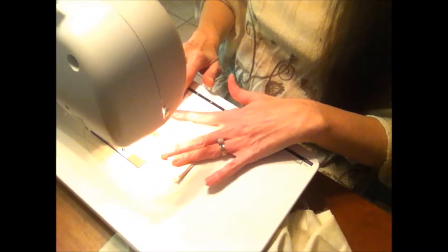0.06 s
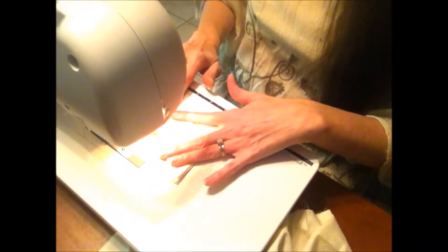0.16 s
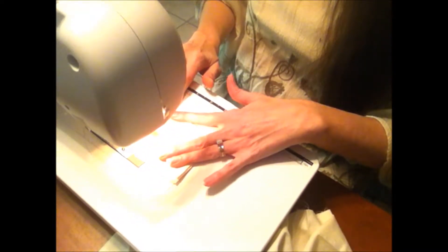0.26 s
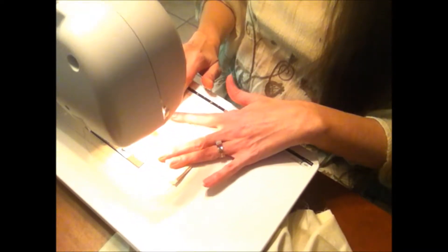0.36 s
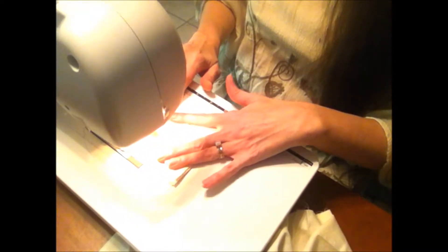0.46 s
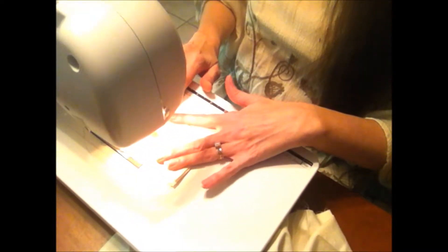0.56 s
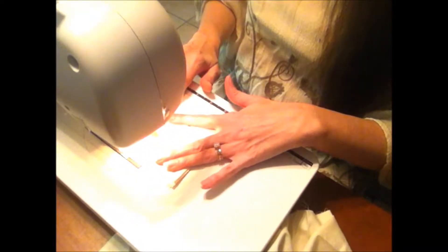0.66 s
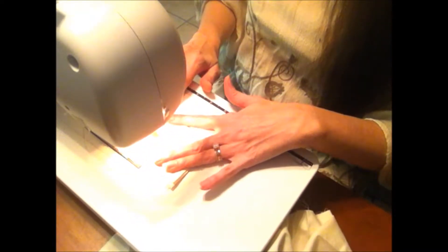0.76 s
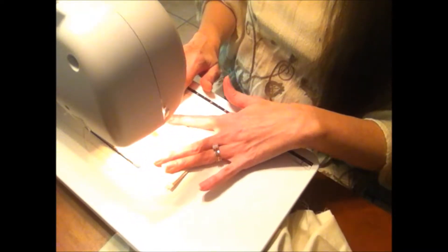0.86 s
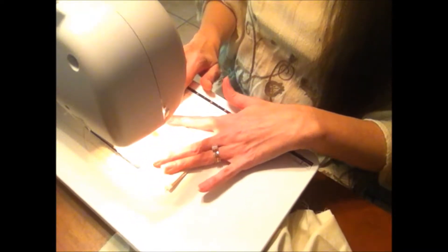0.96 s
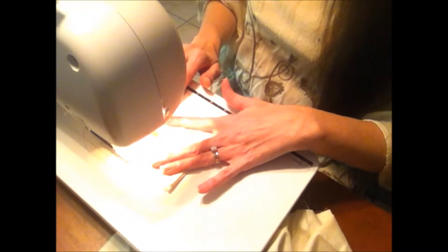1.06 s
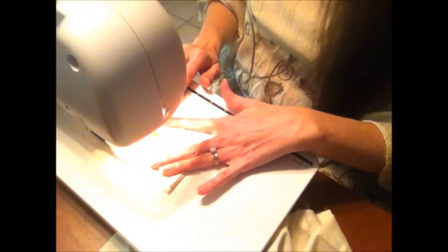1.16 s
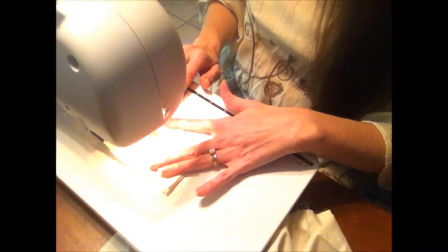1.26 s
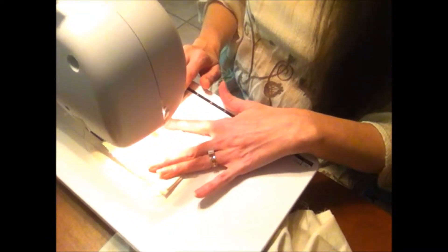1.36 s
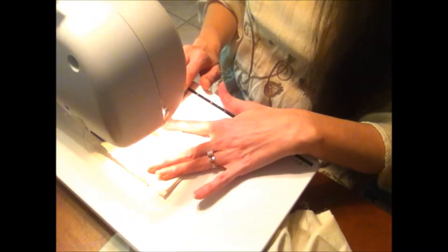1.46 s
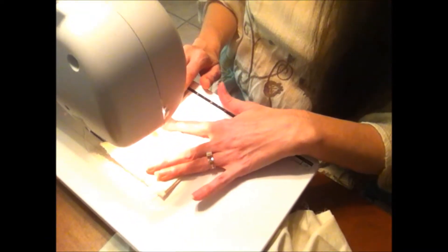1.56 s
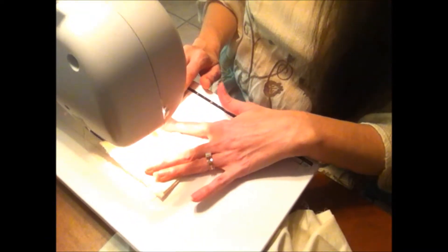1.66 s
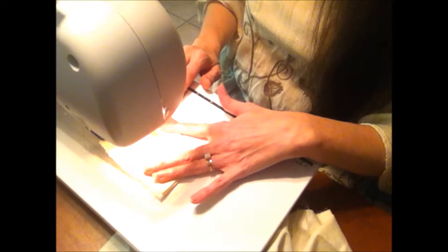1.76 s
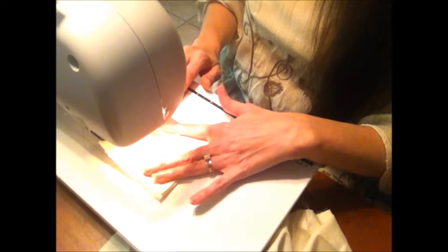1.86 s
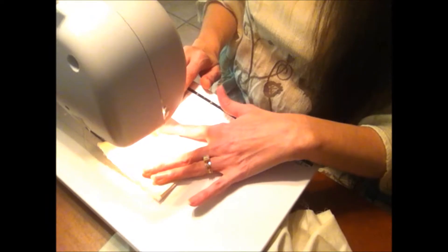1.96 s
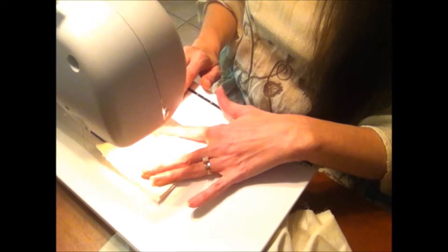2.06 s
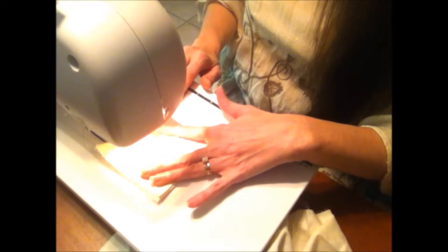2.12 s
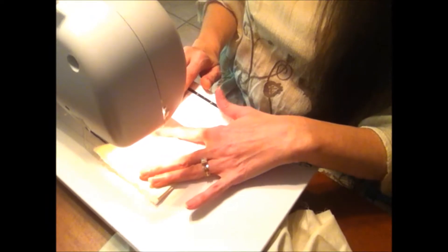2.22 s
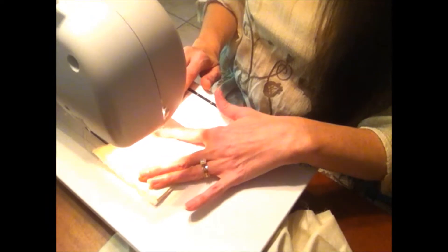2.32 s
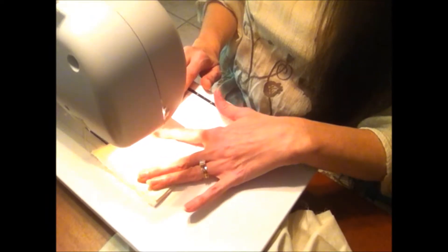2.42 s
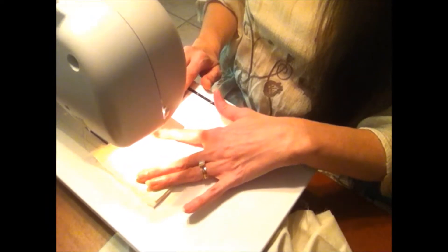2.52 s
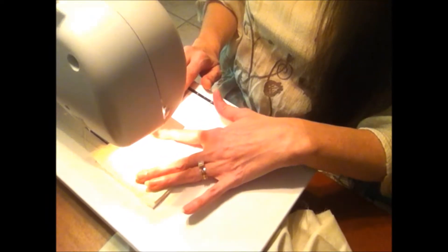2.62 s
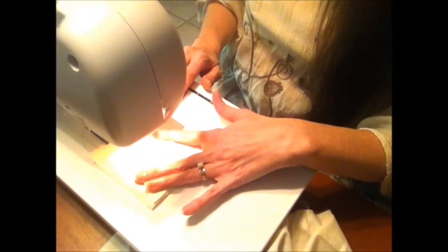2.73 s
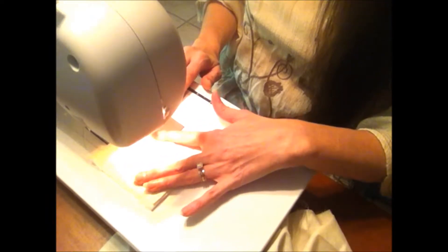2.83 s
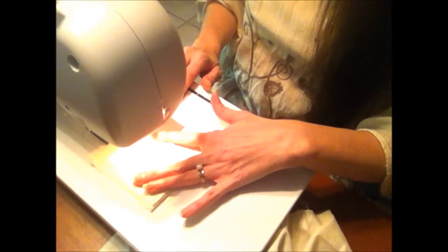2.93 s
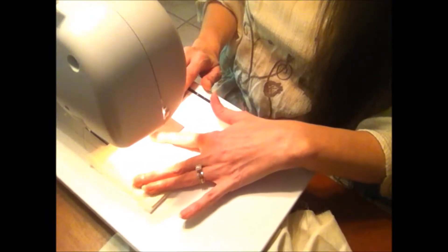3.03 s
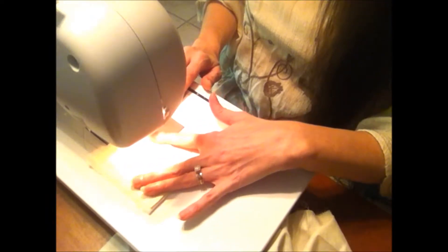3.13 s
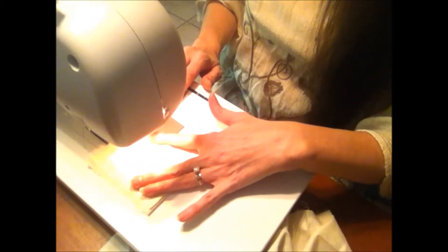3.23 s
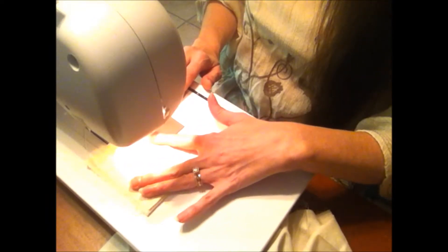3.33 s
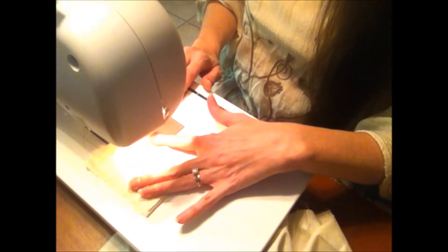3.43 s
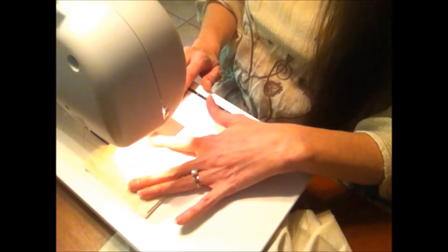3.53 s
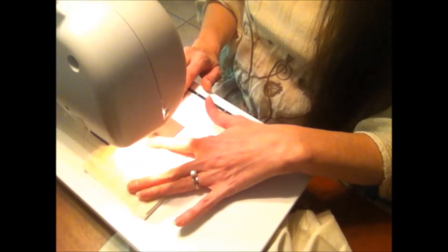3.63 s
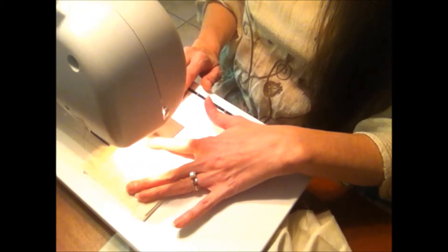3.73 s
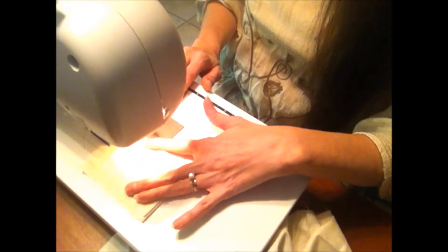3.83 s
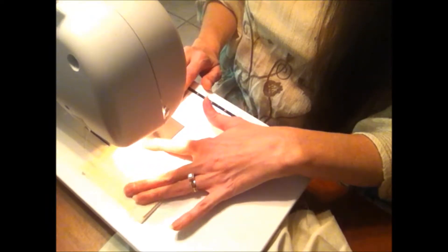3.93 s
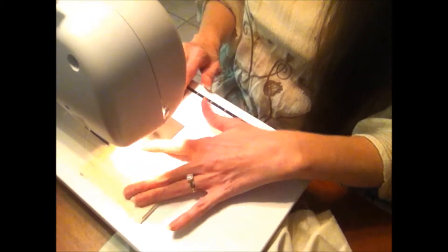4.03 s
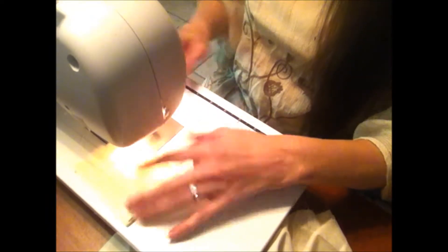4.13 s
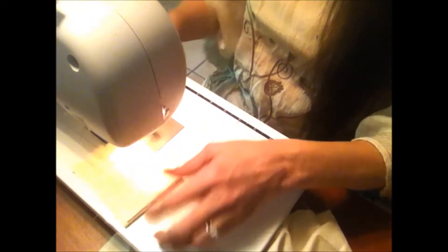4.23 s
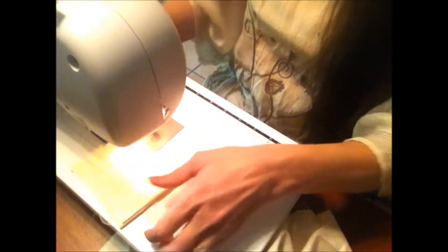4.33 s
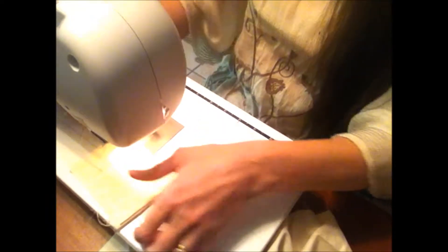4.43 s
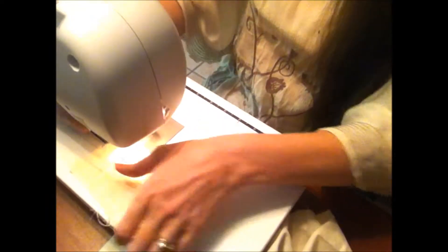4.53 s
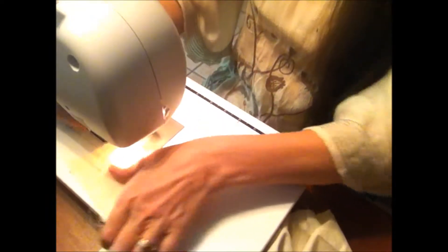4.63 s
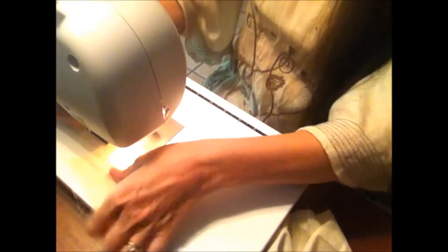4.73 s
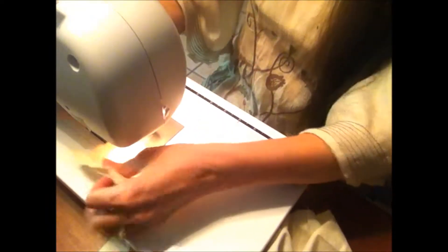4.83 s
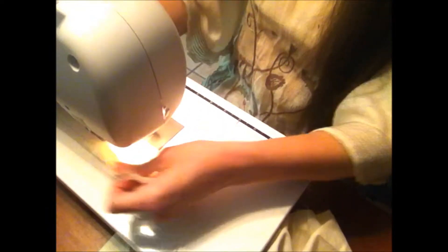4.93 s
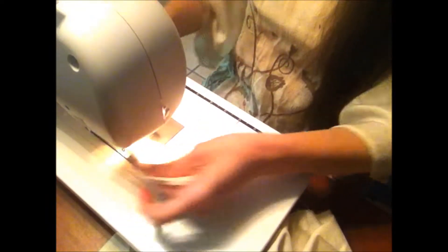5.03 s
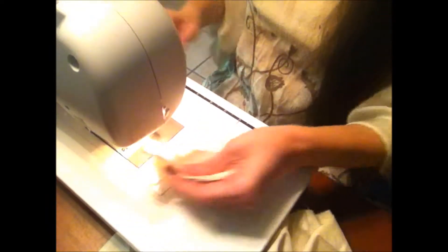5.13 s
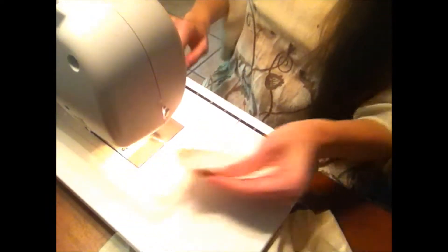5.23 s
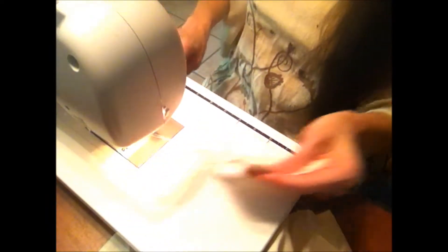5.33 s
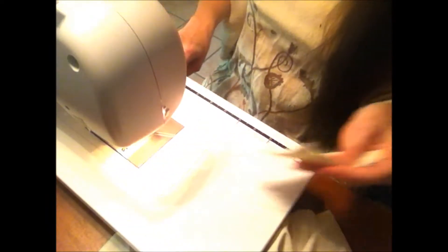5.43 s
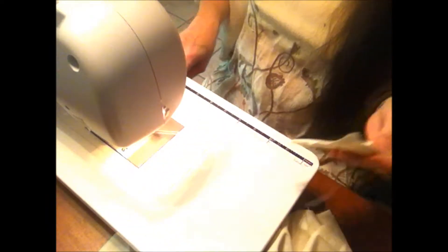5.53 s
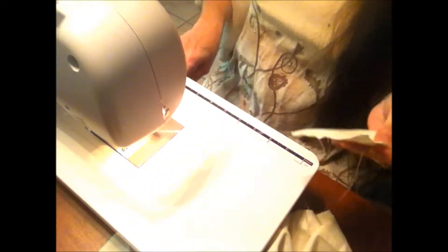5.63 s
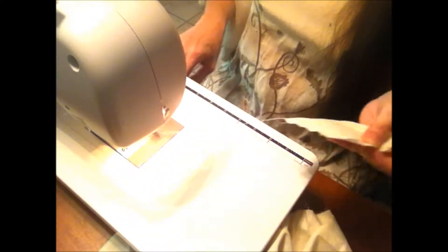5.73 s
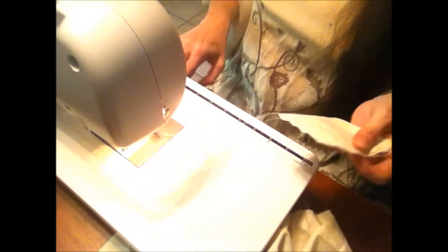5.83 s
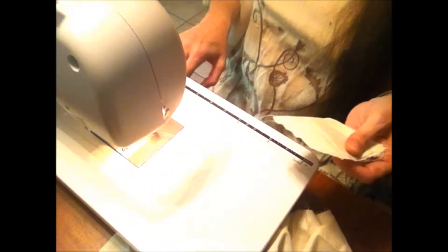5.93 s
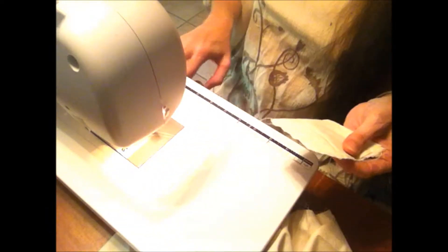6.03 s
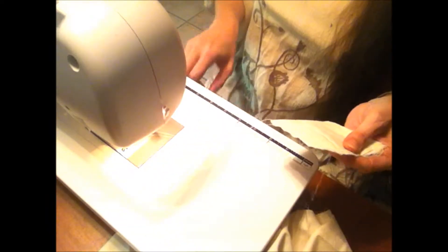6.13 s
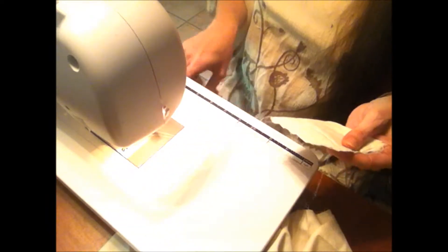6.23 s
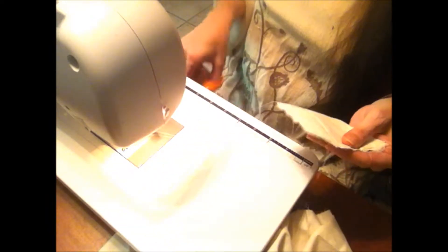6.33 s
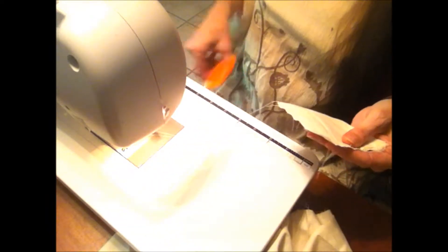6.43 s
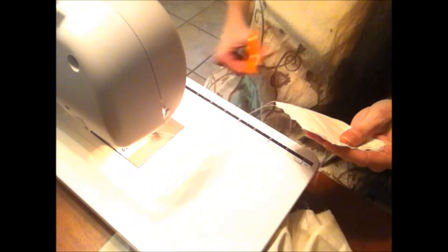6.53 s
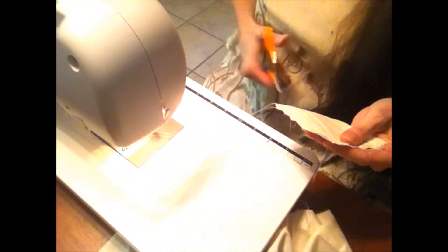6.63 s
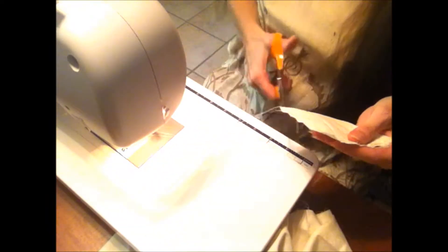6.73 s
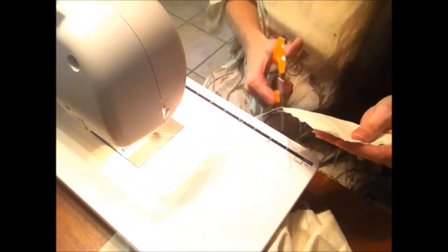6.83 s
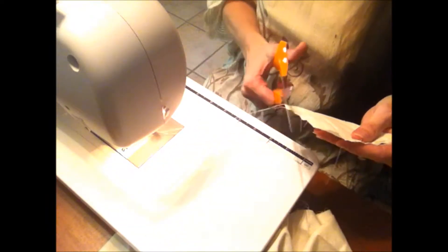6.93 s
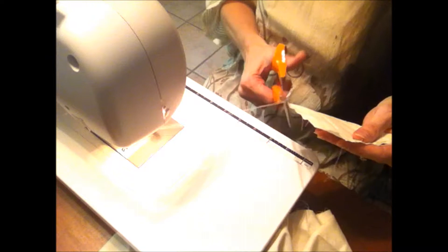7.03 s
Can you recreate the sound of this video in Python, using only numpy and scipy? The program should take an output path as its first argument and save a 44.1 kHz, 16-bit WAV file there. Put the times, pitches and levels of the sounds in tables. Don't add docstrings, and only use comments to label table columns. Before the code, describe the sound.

A sewing machine whirs and clatters at steady full speed, winds down to rest, then cloth rustles, scissors knock wood and snap sharply.

```python
import sys
import numpy as np
from scipy import signal
from scipy.fft import rfft, irfft
from scipy.io import wavfile
from scipy.ndimage import uniform_filter1d

SR = 44100
rng = np.random.default_rng(int(sys.argv[2]) if len(sys.argv) > 2 else 0)


def boost_factor(decibels):
    exponent = np.asarray(decibels, float) / 20
    return 10 ** exponent


def dump(signal):
    limited = np.clip(np.atleast_2d(signal).T, -1, 1)
    pcm = np.round(limited * 32767).astype(np.int16)
    wavfile.write(sys.argv[1], SR, pcm)


N = 311787
T = np.arange(N) / SR

SET_SPEED = 11.2912
RELEASE_S = 4.285
ROOM_T60_S = 0.21

# pitch in Hz, level in dB.
BODY_COLOUR = [(30, -61), (60, -24), (105, -26.5), (160, -24.5), (230, -10.5), (418, -9), (531, -5),
               (760, -7), (950, -7), (1600, -13), (1970, -19), (6510, -34.5), (11000, -36), (15000, -38)]
# pitch in Hz, width in Hz, boost in dB.
BODY_RINGS = [(331, 47, 6), (541, 25, 9), (705, 162, 5.5), (789, 88, 5), (1280, 13, 4), (2544, 47, 7.5),
              (4040, 640, 4.5), (4620, 100, 7.5), (6680, 940, 5.5)]
# pitch in Hz, width in Hz, boost in dB.
WOOD_RINGS = [(985, 80, 10), (1240, 80, 5), (1735, 150, 9), (2400, 170, 9), (2950, 220, 7), (3370, 150, 4),
              (4460, 250, 8)]


def rms_one(x):
    return x / np.sqrt(np.mean(x ** 2) + 1e-20)


def peak_one(x):
    return x / np.abs(x).max()


def colour(x, spectrum, peaks=(), tilt_db=0):
    hz = np.maximum(np.fft.rfftfreq(8192, 1 / SR), 5)
    spectrum_hz, spectrum_db = np.transpose(spectrum)
    level = np.interp(np.log(hz), np.log(spectrum_hz), spectrum_db) + tilt_db * np.log2(hz / 1000)
    for peak_hz, width, gain_db in peaks:
        level = level + gain_db / (1 + (2 * (hz - peak_hz) / width) ** 2)
    cepstrum = irfft(np.log(boost_factor(level)))
    cepstrum[1:4096] *= 2
    cepstrum[4097:] = 0
    response = irfft(np.exp(rfft(cepstrum)))
    return signal.fftconvolve(x, response / np.sqrt(np.sum(response ** 2)))[:len(x)]


def band(x, low_hz, high_hz):
    edges = np.clip([low_hz, high_hz], 10, .45 * SR)
    return signal.sosfilt(signal.butter(2, edges, "band", fs=SR, output="sos"), x)


def drift(rate):
    r = np.exp(-64 * np.pi * rate / SR)
    slow = signal.lfilter([1], [1, -2 * r, r * r], rng.standard_normal(N // 32 + 1502))[1500:]
    return np.interp(np.arange(N) / 32, np.arange(len(slow)), rms_one(slow))


def ring(x, hz, t60):
    r, w = boost_factor(-60 / (t60 * SR)), 2 * np.pi * hz / SR
    return signal.lfilter([0, np.sin(w)], [1, -2 * r * np.cos(w), r * r], x + 1e-18)


def bursts(times, level_db, t60, noise, rise_s=0.0024):
    clicks = np.zeros(len(noise))
    at = np.clip((np.asarray(times) * SR).astype(int), 0, len(noise) - 1)
    np.add.at(clicks, at, boost_factor(level_db))
    r = np.exp(-1 / (rise_s * SR))
    swell = signal.lfilter([1 - r], [1, -r], clicks + 1e-18)
    return signal.lfilter([1], [1, -boost_factor(-60 / (t60 * SR))], swell) * noise


def grains(per_s, spread_db):
    sizes = boost_factor(spread_db * np.minimum(rng.exponential(1, N), 5)) * rng.choice([-1, 1], N)
    return rms_one(sizes * (rng.random(N) < per_s / SR))


def varied(peaks):
    shares = rng.uniform(.5, 1, len(peaks))
    return [(hz, width, db * share) for (hz, width, db), share in zip(peaks, shares)]


def room(x):
    t = np.arange(int(.5 * SR)) / SR
    tail = rng.standard_normal(len(t)) * boost_factor(-60 * t / ROOM_T60_S) * (t > .006)
    tail = band(tail, 73, 10000)
    return x + boost_factor(-10) * signal.fftconvolve(x, tail / np.sqrt(np.sum(tail ** 2)))[:N]


def room_tone():
    # pitch in Hz, level in dB.
    tone_colour = [(12, -31), (20, -5.5), (38, -24.5), (124, 6.5), (270, -6), (841, -11), (940, -12),
                   (13100, -23), (15000, -24.5)]
    return boost_factor(-72) * rms_one(colour(rng.standard_normal(N), tone_colour))


def jolts():
    # start in seconds, peak in dB.
    jolt_rows = [(3.76, -64), (4.21, -65), (5.81, -72), (6.12, -74), (6.33, -70), (6.42, -62), (6.49, -69),
                 (6.675, -54.5)]
    s, level_db = np.transpose(jolt_rows)
    push = bursts(s, level_db, .01, np.ones(N), rise_s=.002)
    return boost_factor(level_db.max()) * peak_one(band(ring(push, 68, 0.068), 25, 200))


def ringing_parts():
    # start in seconds, pitch in Hz, peak in dB, 60 dB decay in seconds.
    steel_notes = [(5.756, 6200, -64, .03), (5.756, 8100, -66, .03), (5.809, 8150, -53, .11),
                   (5.809, 10300, -56, .09), (5.809, 6900, -58, .03), (5.905, 11000, -60, .03),
                   (5.905, 9300, -63, .02), (5.905, 12600, -60, .02), (5.93, 6800, -68, .3),
                   (6.597, 6160, -62, .1), (6.597, 6665, -60, .06), (6.597, 7010, -56, .06),
                   (6.597, 8620, -56, .09), (6.597, 9810, -64, .05), (6.597, 4040, -60, .05),
                   (4.984, 3850, -49, .035), (5.04, 4800, -66, .12), (6.678, 8200, -41, .12),
                   (6.678, 5810, -44, .1)]
    # start in seconds,
    # pitch in Hz, peak in dB, 60 dB decay in seconds.
    part_notes = [(4.29, 551, -35, 0.37), (4.5, 546, -40, 0.13), (4.785, 229, -47, 0.18),
                  (5.49, 280, -54, .06), (5.552, 227, -44, 0.066), (5.599, 230, -53, .05),
                  (5.658, 256, -45, 0.066), (5.815, 243, -44, .05), (5.972, 528, -44, 0.13),
                  (6.025, 555, -40, .06), (6.124, 325, -34, 0.13), (6.342, 214, -37.5, .05),
                  (6.419, 227, -34, .08), (6.493, 214, -31, 0.11), (6.536, 227, -42, .07),
                  (4.985, 803, -42, 0.057), (5.545, 2180, -43, .04), (5.545, 1750, -45, .04),
                   (5.547, 550, -44, 0.078), (5.6, 2450, -57, .03), (5.812, 750, -42, 0.073),
                   (5.94, 1750, -46, 0.056), (5.995, 2600, -52, .06), (6.122, 1750, -36, .03),
                   (6.124, 546, -37, 0.099), (6.14, 2400, -42, .04), (6.16, 550, -41, .08),
                   (6.343, 1750, -46, .03), (6.42, 1750, -33, .03), (6.42, 2450, -35, .03),
                   (6.442, 2530, -37, .03), (6.49, 1750, -33, .025), (6.68, 1000, -20, .025),
                   (6.712, 1330, -33, 0.027)]
    size = 12000
    out = np.zeros(N + size)
    for s, hz, level_db, t60 in steel_notes + part_notes:
        shake = bursts(np.zeros(1), np.zeros(1), .012, rng.standard_normal(size), rise_s=.0004)
        i = int(s * SR)
        out[i:i + size] += boost_factor(level_db) * peak_one(band(ring(shake, hz, t60), hz / 2, hz * 2))
    return out[:N]


def blows():
    # start in seconds, thud peak in dB,
    # softness as dB lost by the tick, ring pitch in Hz, ring against thud in dB.
    tap_rows = [(4.796, -58, 11, 500, 7), (5.016, -63, 7, 865, 15), (5.314, -69, 20, 616, -3),
                (5.351, -62, 14, 1530, 10), (5.399, -53, 5, 300, -13), (5.52, -44, 20, 1490, -5),
                (5.542, -34, 69, 1450, -4), (5.558, -42, 44, 1450, -1), (5.596, -42, 33, 545, -1),
                (5.64, -50.5, 4, 545, 5), (5.869, -52, 30, 541, 0), (5.902, -53, -3, 545, 11),
                (5.931, -51, 30, 600, 7), (5.967, -52, 20, 545, 8), (6.039, -55.5, -2, 217, 11),
                (6.104, -62, 30, 1740, -2), (6.121, -27, 17, 2310, -9), (6.145, -30, 53, 560, -1),
                (6.327, -57.5, 7, 950, -7.5), (6.343, -38.5, 15, 1020, -8), (6.369, -42.5, 28.5, 1030, 1),
                (6.418, -18, 35, 550, -9), (6.441, -26, 12, 1020, -8), (6.467, -45, 14.5, 2425, 0),
                (6.533, -40.5, 9.5, 3040, -7), (6.489, -20, 49.5, 980, -3), (6.522, -35, 20, 1400, -1.5),
                (6.408, -42.5, 33, 700, -4.5), (6.712, -43, 29.5, 1300, 2)]
    # start in seconds,
    # crack peak in dB, tick against crack in dB, ring pitch in Hz, ring against crack in dB.
    click_rows = [(4.51, -43.5, 2, 3900, -6.5), (4.595, -52, 2, 4200, -7), (4.612, -53, 0, 2750, -8),
                  (4.67, -48, -10, 2200, -12), (4.724, -56, -2, 3100, -3), (4.763, -54, -1, 4380, 1),
                  (4.774, -41.5, -10, 1460, -16), (4.824, -53.5, 2, 725, -1), (4.905, -55, 7, 3020, -23),
                  (4.933, -55, -2, 1800, -2), (4.982, -39.5, -1, 802, 2), (5.028, -51, 1, 4700, 8.5),
                  (5.092, -67, -3, 3030, 4), (5.152, -60, -12, 1600, 2), (5.797, -50, -22, 1900, -4),
                  (5.183, -43.5, -5.5, 1560, -13), (5.754, -50, -4, 1550, -10),
                  (5.808, -35.5, 2.5, 1510, -6), (6.597, -59, 21.5, 7050, 17)]
    rows = []
    for s, thud_db, soft, hz, ring_db in tap_rows:
        crack_db = thud_db + 4 - 0.17 * soft
        rows.append((s, thud_db, crack_db, thud_db - soft, hz, thud_db + ring_db))
    for s, crack_db, tick_db, hz, ring_db in click_rows:
        rows.append((s, crack_db - 5.5, crack_db, crack_db + tick_db, hz, crack_db + ring_db))
    return rows


def knocks():
    # pitch in Hz, level in dB, 60 dB decay in seconds.
    table_modes = [(217, -1.5, 0.046), (325, -2.5, 0.071), (557, -4.5, 0.048), (577, -11.5, 0.043),
                   (719, -19.5, 0.19), (1020, -15.5, 0.015), (995, -17, 0.05)]
    # pitch in Hz, width in Hz, boost in dB.
    metal_rings = [(3850, 300, 5), (4500, 250, 6), (6400, 400, 7), (8850, 500, 2)]
    crack_colour = [(900, -5.0), (2500, -5.5), (5000, -15.0)]
    tick_colour = [(2000, .1), (12000, -.1)]
    out, thin, size = np.zeros(N), np.zeros(N), 6000
    for s, thud_db, crack_db, tick_db, ring_hz, ring_db in blows():
        noise = rng.standard_normal((3, size))
        luck = rng.standard_normal(len(table_modes))
        push, crack, tick = (bursts(np.zeros(1), np.zeros(1), .027, n, rise_s=.0012) for n in noise)

        thud = sum(boost_factor(g + 1.6 * c) * ring(push, hz, t60) for (hz, g, t60), c in zip(table_modes, luck))
        thud = band(band(thud + 20.0 * band(push, 470, 1200), 410, 3000), 300, 5000)
        snap = band(colour(crack, crack_colour, varied(WOOD_RINGS)), 780, 4800)
        tick = band(band(colour(tick, tick_colour, varied(metal_rings)), 2700, 14000), 2500, 15000)
        blow = boost_factor(thud_db) * peak_one(thud) + boost_factor(crack_db) * peak_one(snap) + boost_factor(tick_db) * peak_one(tick)

        note = ring(crack, ring_hz, .006 + 11 / ring_hz)
        note = boost_factor(ring_db) * peak_one(band(note, ring_hz / 2, ring_hz * 2))
        i = int(s * SR)
        out[i:i + size] += blow
        target = thin if ring_hz > 3000 else out
        target[i:i + size] += note
    return room(out) + thin


def strokes(rows, rise_db_s, fall_db_s):
    shake, scrape = np.zeros(N), np.zeros(N)
    for s, hold, level_db, scrape_db in rows:
        fade_db = rise_db_s * np.maximum(s - T, 0) + fall_db_s * np.maximum(T - s - hold, 0)
        gain = boost_factor(level_db - fade_db)
        shake += gain
        scrape += gain * boost_factor(scrape_db)
    return shake, scrape


def handling():
    # pitch in Hz, level in dB.
    table_colour = [(35, -70), (60, -48), (194, -1), (388, -11), (542, 1), (860, -10.5), (975, -11),
                    (2900, -22), (9000, -44), (11700, -62), (19800, -120)]
    # start in seconds, hold in seconds,
    # shake of the table in dB, scrape against shake in dB.
    cloth_rows = [(5.0, 0.022, -66, 1), (5.18, 0.09, -75, -4), (5.36, 0.11, -58, -5),
                  (5.6, 0.048, -50, -13)]
    # start in seconds, hold in seconds,
    # shake of the table in dB, scrape against shake in dB.
    slide_rows = [(5.79, 0.039, -57.5, -3), (5.855, 0.021, -59, -15), (5.885, 0.021, -45.5, -11.5),
                  (5.925, 0.037, -50, 0), (5.975, 0.031, -45.5, -6.5), (6.02, 0.012, -63, -15),
                  (6.14, 0.047, -46, -4.5), (6.345, 0.019, -54, -12), (6.375, .03, -57.5, -3),
                  (6.412, .004, -48, -3.5), (6.452, 0.0068, -41.5, 3.5), (6.525, 0.014, -43, -2),
                  (6.585, .005, -70.5, -10)]
    # start in seconds, hold in seconds,
    # level in dB, coarser brushing against it in dB.
    sleeve_rows = [(4.95, .1, -88, -6), (5.3, 0.24, -73, -6), (5.8, .08, -94, -6), (5.93, .07, -79, 13.5),
                   (6.6, .04, -74.5, -5.5)]
    cloth, cloth_scrape = strokes(cloth_rows, 80, 173)
    slide, slide_scrape = strokes(slide_rows, 608, 307.5)
    fine, coarse = strokes(sleeve_rows, 120, 98.5)
    clumps = drift(25)

    drag_rings = [(320, 56, 7.0), (545, 16, 4.2), (750, 82, 9.1), (1110, 73, 1.4)]
    drag = rms_one(band(colour(grains(5000, 1.9), table_colour, drag_rings), 180, 2200))
    skid_rings = [(220, 40, 6), (330, 40, 3), (550, 50, 8), (970, 70, 6), (1200, 90, 7)]
    skid = rms_one(band(colour(grains(2500, 3.0), table_colour, skid_rings), 200, 2800))

    rub = band(grains(8000, 3.6), 800, 5200)
    on_bed = rms_one(colour(rub, [(900, -2), (3500, -11.5)], [(1530, 150, 9), (2920, 200, 3)]))
    on_wood = rms_one(colour(rub, [(900, 5.0), (4500, -17.5)], WOOD_RINGS))

    rustle_rings = [(4530, 160, 10.0), (5550, 120, 6), (10800, 400, 4)]
    rustle = band(grains(9000, 4.8), 3900, 13000)
    rustle = rms_one(colour(rustle, [(3500, -4.5), (12000, -13.0)], rustle_rings))
    rustle *= boost_factor(1.2 * drift(30)) * (boost_factor(-16.5) * cloth + boost_factor(-28.5) * slide)

    brush_rings = [(1200, 90, 6), (1750, 130, 8), (2600, 120, 6), (2950, 140, 8)]
    whisper = fine * rms_one(band(grains(14000, 2.0), 7000, 14500))
    whisper += coarse * rms_one(colour(rub[::-1], [(1000, 2.5), (4000, -11.5)], brush_rings))

    shaking = cloth * drag + slide * skid
    scraping = cloth_scrape * on_bed + slide_scrape * on_wood
    return boost_factor(1.1 * clumps) * (shaking + scraping) + rustle + whisper


def scissors():
    snap = (6.6762, -15.5)
    # pitch in Hz, level in dB.
    snap_colour = [(60, -30.5), (130, -12), (240, 1.5), (640, 1), (1100, -5), (1500, -0.5), (2200, -8),
                   (4400, -6.5), (6000, -12), (8600, -8), (11000, -15), (15500, -24)]
    s, level_db = snap
    noise, steady = rng.standard_normal(N), np.ones(N)
    click = bursts([s], level_db + 3.0, 0.00032, steady, rise_s=.00003)
    rattle = bursts([s - .003, s], [level_db - 22, level_db + 1.5], 0.05, noise, rise_s=0.00062)
    scatter = bursts([s + 0.0045], level_db - 12.5, ROOM_T60_S, noise[::-1], rise_s=0.0024)
    push = bursts([s + 0.013], 0, .004, steady, rise_s=.0003)
    thump = boost_factor(level_db - 7) * peak_one(band(ring(push, 250, 0.045), 170, 600))
    blade = boost_factor(level_db + .8) * peak_one(band(ring(click, 1220, .016), 700, 2600))
    in_room = room(-colour(click, snap_colour) - .5 * blade + .4 * thump)
    return in_room - .65 * blade + .6 * thump + colour(band(rattle, 600, 19000) + scatter, snap_colour)


def shaft_speed():
    driven = np.minimum(T, RELEASE_S)
    speed = SET_SPEED - .3237 * np.exp(-driven / .6) + .0551 * driven
    friction, drag_per_s = 13.5, .6
    limit = friction / drag_per_s
    speed = np.maximum((speed + limit) * np.exp(-drag_per_s * (T - driven)) - limit, 0)
    return uniform_filter1d(speed, size=int(.065 * SR), mode="nearest")


def shaft_tone(order, level_db, speed, turn, phase):
    # pitch in Hz, level in dB.
    housing = [(50, -62), (105, -24), (140, -5.5), (195, 1.5), (240, 3), (390, 5), (550, 5.5), (800, 1),
               (1000, -3.5), (2000, -16.5)]
    hz, gain_db = np.transpose(housing)

    def radiate(f):
        return np.interp(np.log(f + 1), np.log(hz), gain_db)

    change_db = radiate(order * speed) - radiate(order * speed.max())
    return np.sqrt(2) * boost_factor(level_db + change_db) * np.sin(2 * np.pi * (order * turn + phase))


def belt(speed, turn, slow):
    hum_orders = [10, 11, 12, 13, 15, 17, 19, 20, 21, 24, 27, 30, 34, 40, 41, 46, 48, 57, 60, 61, 68, 74]
    hum_levels = [-60.5, -63, -71, -64, -70, -43, -53.5, -59, -53.5, -59, -58.5, -56.5, -55, -57.5, -59.5,
                  -58, -50.5, -56.5, -53, -62, -77, -55]
    # multiple of the turn rate, level in dB, turns per second where it dies.
    whine_rows = [(32.3, 5, 4.4), (85, -9, 6.2), (102, -8, 6.2), (123, 0, 6.1), (136, -12, 6.2),
                  (153, -10, 6.2)]
    out = np.zeros(N)
    for order, level_db in zip(hum_orders, hum_levels):
        phase = rng.random() + .22 * (order / 48) ** 2 * drift(14)
        out += shaft_tone(order, level_db + 0.6 + 24 * slow + .5 * drift(7.2), speed, turn, phase)
    slack = np.clip((T - RELEASE_S) / .22 + 0.26, 0, 1)
    loaded_db, slack_db = -71, -57
    whine_db = loaded_db + (slack_db - loaded_db) * slack
    for order, level_db, stall in whine_rows:
        stall_db = 11 * np.maximum(stall - speed, 0)
        tone_db = level_db + whine_db + 3.5 * drift(28) - stall_db
        out += shaft_tone(order, tone_db, speed, turn, order / 750 * drift(35))
    return out


def gears(turn, slow, spot):
    rattle = grains(3000, 3.1)[spot] + grains(4000, 1.1) * boost_factor(0.89 * drift(35))
    rumble = rms_one(colour(rattle, BODY_COLOUR, BODY_RINGS, tilt_db=0.5))
    dull = signal.lfilter(*signal.butter(1, 1200, fs=SR), rumble)
    from_punch = (turn - .93 + .5) % 1 - .5
    load_db = 2.5 * np.exp(-(from_punch / .07) ** 2) + .8 * drift(15)
    out = boost_factor(-38.5 + 42.5 * slow + load_db) * (dull + boost_factor(26 * slow) * (rumble - dull))
    hiss = rms_one(band(colour(grains(9000, 2.4), BODY_COLOUR, BODY_RINGS), 1600, 21000))
    out += boost_factor(-49.5 + 23.5 * slow + 2.8 * drift(35)) * hiss
    return out + boost_factor(-67.5 + 14 * slow) * rms_one(band(grains(12000, 2.5), 8000, 15000))


def contacts(speed, turn, spot):
    # angle in turns, level in dB, brightness in dB per octave.
    contact_rows = [(.0, -39.5, -7), (0.215, -51.5, 10), (.25, -36, -3.5), (0.361, -47, 2), (.49, -36, -20),
                    (0.585, -46, 10), (.61, -49.5, -1), (0.762, -45.5, 9), (0.789, -44.5, 1),
                    (0.828, -39.5, -0.5), (0.856, -41, 0), (0.885, -41, -3), (.92, -38.5, -2.5),
                    (0.962, -38.5, -2.5)]
    out = np.zeros(N)
    whole = np.arange(int(turn[-1]) + 1)
    strike = .8 * rng.standard_normal(N)[spot] + 3.2 * rng.standard_normal(N)
    for angle, level_db, bright in contact_rows:
        luck = rng.standard_normal((len(whole), 2))
        at = np.interp(whole + angle - .012 + 0.0037 * luck[:, 0], turn, T)
        blow_db = 42 * np.log10(np.interp(at, T, speed) / 12.19 + 0.0032)
        hits = bursts(at, level_db + blow_db + 2 * luck[:, 1], .016, strike, rise_s=.0005)
        hits = colour(hits, BODY_COLOUR, BODY_RINGS + [(3100, 590, 3.37)], tilt_db=2.5 + bright)
        out += band(hits, 1434, 10450)
    return out


def machine():
    speed = shaft_speed()
    turn = .026 + np.cumsum(speed) / SR
    slow = np.log10(np.minimum(speed / SET_SPEED, 1) + 1e-4)
    spot = ((turn % 1) * 3800).astype(int)
    return belt(speed, turn, slow) + gears(turn, slow, spot) + contacts(speed, turn, spot)


def scene():
    hands = handling() + knocks() + ringing_parts() + scissors()
    return (room_tone() + hands + machine())[None]


def top_cut(x):
    return signal.sosfilt(signal.butter(12, 15920, fs=SR, output="sos"), x)


def record(dry):
    thin = band(band(dry, 70, 12000), 70, 12000)
    electrical = boost_factor(-90.5) * rms_one(band(rng.standard_normal(N), 18, 80))
    return top_cut(thin + electrical + jolts())


dry = scene()
out = record(dry)
dump(out)
```